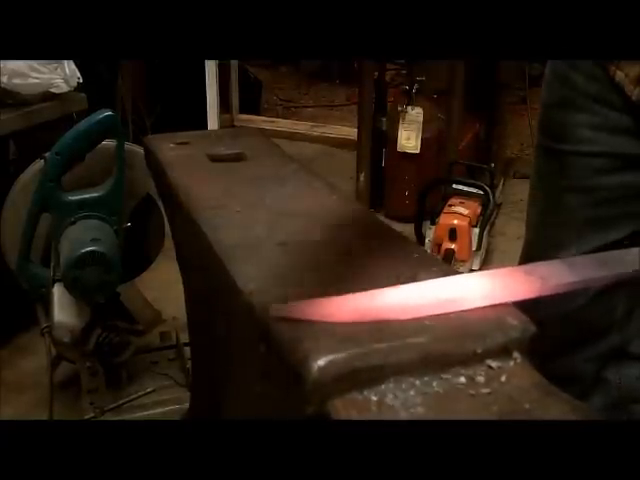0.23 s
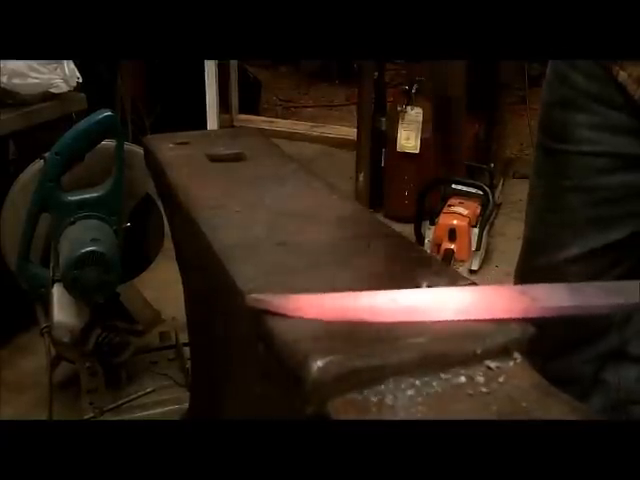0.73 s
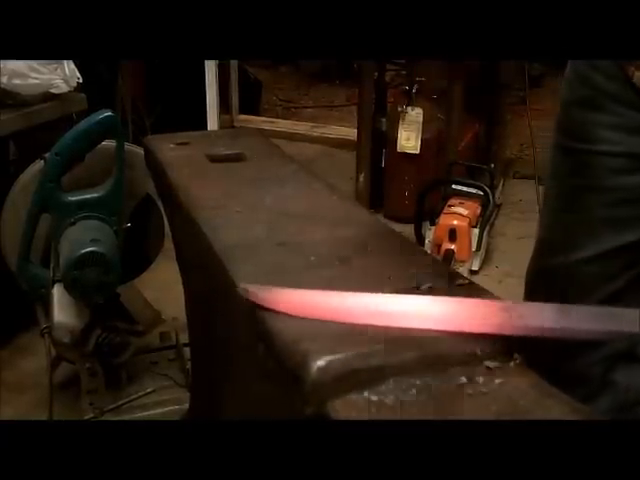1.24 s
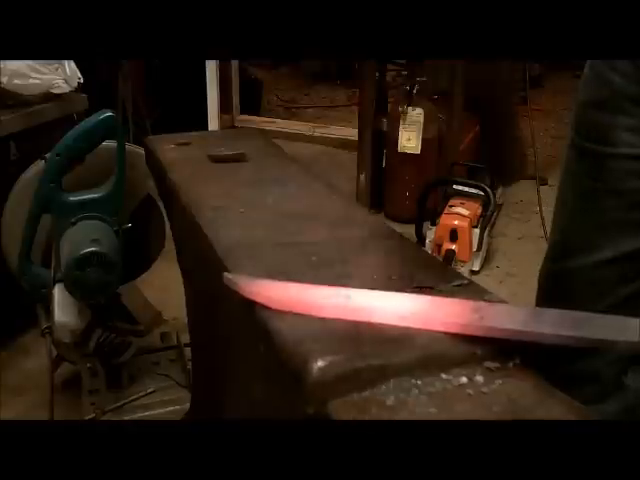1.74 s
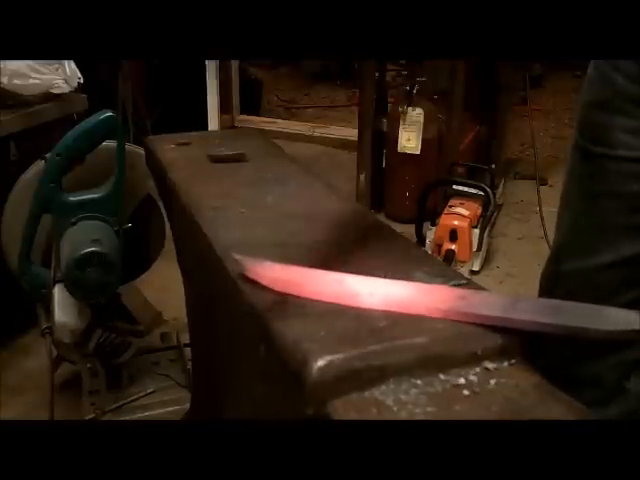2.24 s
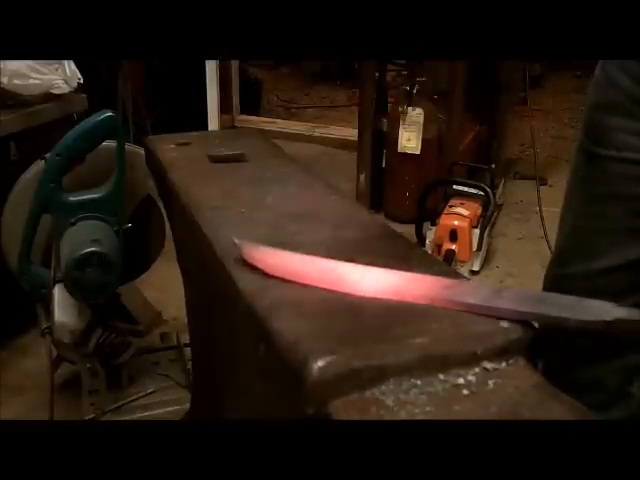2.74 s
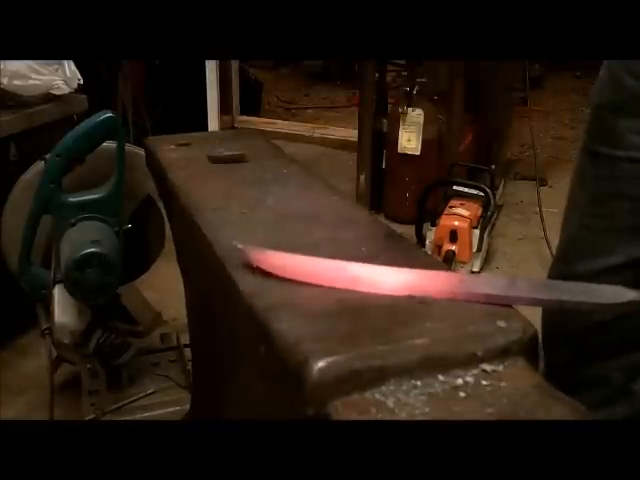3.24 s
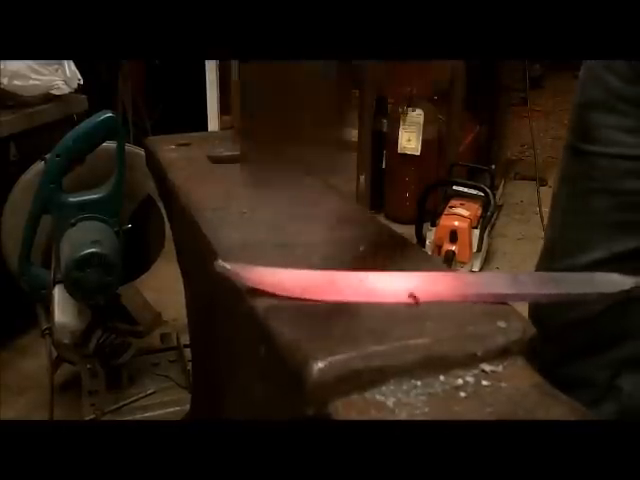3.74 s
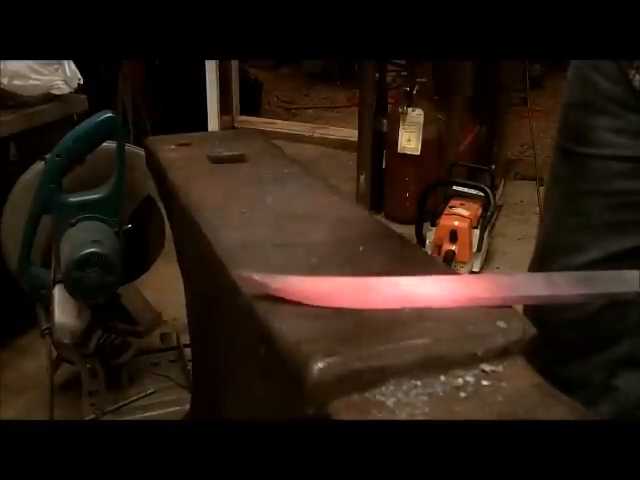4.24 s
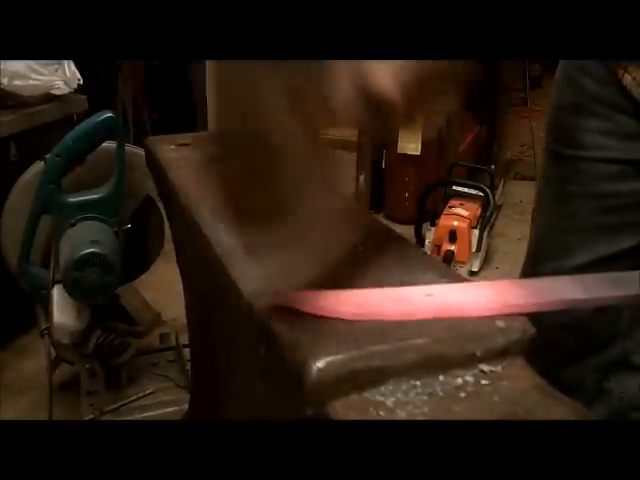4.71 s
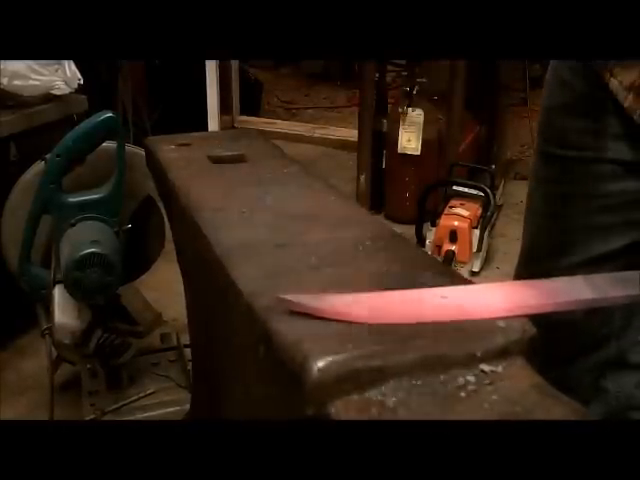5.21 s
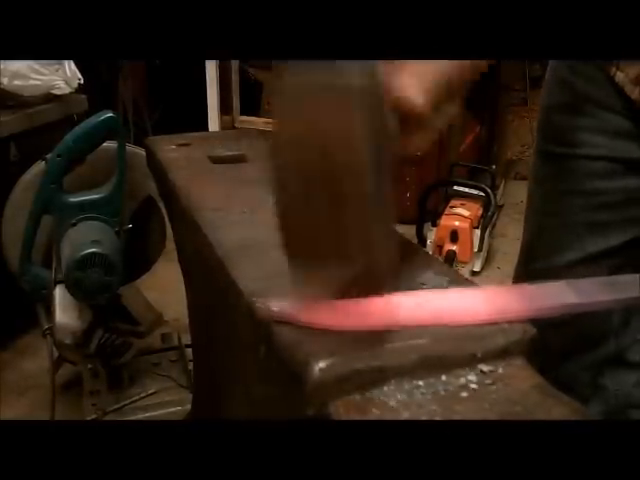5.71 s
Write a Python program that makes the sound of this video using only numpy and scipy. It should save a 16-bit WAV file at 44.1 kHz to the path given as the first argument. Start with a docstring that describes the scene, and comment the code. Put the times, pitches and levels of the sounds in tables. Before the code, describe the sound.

Steady quick hammer blows on an anvil, hard clanks with high ringing tails, a brief scrape of sliding steel, and workshop rush underneath.

```python
"""A smith hammers a red-hot blade on an anvil, three blows a second, in a small workshop.
Each blow sets decaying anvil modes ringing; where it lands decides which of them speak.
It also cracks (noise burst and shop echo), thuds (air pulses, rocking stand) and slaps the blade on the face.
Under it lie the shop's steady rush and the scrape of the sliding blade, both filtered noise.
A close camera's gain control ducks at loud blows and swells ring and rush back up in between."""
import sys
import numpy as np
from scipy import signal
from scipy.io import wavfile
from scipy.ndimage import uniform_filter1d

SR = 44100
rng = np.random.default_rng(int(sys.argv[2]) if len(sys.argv) > 2 else 0)


def store_pcm(level_fs):
    """Save levels as 16-bit WAV."""
    pcm = np.round(np.clip(level_fs, -1, 1) * 32767).astype(np.int16)
    wavfile.write(sys.argv[1], SR, np.atleast_2d(pcm).T)


N = 262836
TIME_S = np.arange(N) / SR

# hammer blows: (t/s, force/dB, press: ring lost while hammer and blade stay down/dB,
#                struck spot along the working stretch of the face/0-1, thud/dB, blade slap/dB)
HAMMER_BLOWS = [(-0.11, 19.5, 7, 0.71, -22, -21.5), (0.2273, 17, 5.5, 0.84, -10, 0),
                (0.5653, 16.5, 7.5, 0.8, -12, -7), (0.8933, 22.5, 7.5, 0.46, -9, 3),
                (1.2253, 19.3, 6.3, 0.45, -9.5, 0.3), (1.5589, 19, 8.5, 0.41, -2.5, 0.5),
                (1.8952, 21, 8, 0.25, -5.5, -1.5), (2.2459, 15.5, 2.5, 0.14, -41, -12),
                (2.6191, 17, 2.5, 0.19, -42, -22), (3.001, 21.5, 5.4, 0.22, -10, -21),
                (3.4232, 23, 5.5, 0.43, 5, -17), (3.785, 15.5, 0.15, 0.42, -10, -34),
                (4.1144, 10, -1.3, 0.82, -47, -44), (4.4456, 13.5, 1.5, 0.68, -12, -40),
                (4.7914, 18.5, 4.5, 0.64, -9.5, -1), (5.1325, 18.5, 6.5, .695, -0.3, -32),
                (5.4784, 21.5, 9, 0.42, -1, -13), (5.8114, 26, 9, 0.71, -5, 2)]
START_S, FORCE_DB, PRESS_DB, SPOT, THUD_DB, SLAP_DB = np.transpose(HAMMER_BLOWS)


def from_db(db):
    """Decibels to gain."""
    return 10 ** (np.asarray(db) / 20)


def at_hz(points, hz):
    """Read a table, linear over log frequency."""
    table_hz, values = np.transpose(points)
    return np.interp(np.log(hz), np.log(table_hz), values)


def fade(age_s, t60_s):
    """Exponential decay, 60 dB down at t60."""
    return np.exp(-np.log(1000) * age_s / t60_s)


def butter(x, hz, kind, order=2):
    """Causal Butterworth filter."""
    return signal.sosfilt(signal.butter(order, hz, kind, fs=SR, output="sos"), x)


def drift(knots_per_s):
    """Random wander about 0: unit-spread Gaussian knots joined by straight lines."""
    knots = rng.standard_normal(1024)
    return np.interp(TIME_S * knots_per_s, np.arange(len(knots)), knots)


def noise_bands():
    """Half-octave bands of unit white noise, neighbours unrelated: (centre Hz, band)."""
    edges_hz = 22 * 2 ** np.arange(0, 10, 0.5)
    white = rng.standard_normal((2, N))
    for k, (low, high) in enumerate(zip(edges_hz, edges_hz[1:])):
        yield np.sqrt(low * high), butter(white[k % 2], [low, high], "band")


def shaped_noise(spectrum):
    """Steady noise with the tabled spectrum."""
    return sum(from_db(at_hz(spectrum, hz)) * band for hz, band in noise_bands())


def latest_blow():
    """For each sample: row of the latest blow and the time since it landed."""
    row = np.maximum(np.searchsorted(START_S, TIME_S, side="right") - 1, 0)
    return row, np.maximum(TIME_S - START_S[row], 0)


def shop_rush():
    """Steady rush of the shop: broadband noise shaped in frequency."""
    # gain on unit white noise: (f/Hz, level/dB)
    rush_spectrum = [(30, -33), (150, -32.5), (500, -40), (1000, -34), (2000, -28), (3000, -36),
                     (4700, -31.5), (6500, -42.5), (9500, -51.5), (15000, -80)]
    return shaped_noise(rush_spectrum)


def blade_slide():
    """Hot steel and loose scale drag unevenly over the anvil between light blows: rumble and hiss."""
    # slide envelope: (t/s, level/dB)
    slide_level = [(3.8, -30), (3.87, 8), (4.0, -1), (4.18, 7), (4.32, 7), (4.44, -23), (4.5, -40)]
    # scrape, gain on unit white noise: (f/Hz, level/dB)
    scrape_spectrum = [(40, -35), (110, -26), (210, -31.5), (450, -40.5), (2000, -36), (6500, -61),
                       (9500, -48), (13000, -67)]
    level_db = np.interp(TIME_S, *np.transpose(slide_level), left=-100, right=-100)
    level_db = level_db + 0.96 * drift(30)
    return from_db(level_db) * shaped_noise(scrape_spectrum)


def blade_slap(row, age_s, blade_hz, t60_s, level_db):
    """A blade that does not lie flat claps onto the face; hot steel rings only a few cycles."""
    ring = np.sin(2 * np.pi * blade_hz * age_s) * fade(age_s, t60_s)
    return from_db(level_db + SLAP_DB[row]) * ring


def thud(row, age_s, firm_rise_s, gap_s, push_db, stand_hz, stand_t60_s, stand_db, rock_share,
         softening, firm_db):
    """Two shoves of air, hammer on blade then blade on anvil; the anvil rocks on its stand."""
    # a lighter blow shoves more slowly
    rise_s = firm_rise_s * from_db(softening * np.maximum(firm_db - FORCE_DB[row], 0))
    since = np.maximum([age_s, age_s - gap_s], 0) / rise_s
    push = from_db(push_db) * np.sum(since * np.exp(1 - since), axis=0)
    rock = np.sin(2 * np.pi * stand_hz * age_s) * fade(age_s, stand_t60_s)
    rock = from_db(stand_db + rock_share * THUD_DB[row]) * rock
    # a hammer that stays down rocks the stand more
    follow_through = np.sqrt(1 - from_db(-np.maximum(PRESS_DB[row], 0)))
    return from_db(THUD_DB[row]) * push + follow_through * rock


def crack_and_shop(row, age_s, bite_s, crack_t60_s, top_t60_s, bounce_db, shop_delay_s, splash_hz,
                   splash_growth, usual_press_db):
    """A few milliseconds of dense contact noise, then its echo building and dying in the shop."""
    # steel on steel, gain on unit white noise: (f/Hz, level/dB)
    crack_spectrum = [(100, -14.5), (350, -13), (900, -11), (1400, -2), (2000, -19.5), (3700, 0), (4800, 0),
                      (6500, -22), (9500, -11.5), (15000, -19.5)]
    # shop's answer, gain on unit white noise: (f/Hz, level/dB)
    shop_spectrum = [(30, -14.5), (90, -19.5), (170, -21.5), (400, -29.5), (1000, -31.5), (2000, -17.5),
                     (3000, -29), (4700, -28), (6500, -33.5), (9500, -37.5), (15000, -62)]
    # shop's decay: (f/Hz, t60/s)
    shop_decay = [(50, 0.4), (500, 0.41), (2000, 0.38), (5000, 0.53), (14000, 0.22)]
    press_db = PRESS_DB[row]
    # a hammer that bounces off at once cracks harder; a firm press leaves a brighter tail
    hardness = from_db(bounce_db * from_db(-press_db))
    splash = from_db(splash_growth * (press_db - usual_press_db))
    bite = hardness * (1 - np.exp(-age_s / bite_s))
    build = 1 - np.exp(-age_s / shop_delay_s)
    out = np.zeros(N)
    for hz, band in noise_bands():
        # the top of the crack is over first
        burst = bite * fade(age_s, crack_t60_s if hz < splash_hz else top_t60_s)
        crack = from_db(at_hz(crack_spectrum, hz)) * burst
        echo = from_db(at_hz(shop_spectrum, hz)) * build * fade(age_s, at_hz(shop_decay, hz))
        if hz > splash_hz:
            echo = echo * splash
        out += band * np.hypot(crack, echo)
    return out


def family_drive():
    """dB per family and blow: modes speak most far from their nodes; press alters each family's share."""
    # mode families 0-7, each one standing wave of the face:
    # (level/dB, growth/dB per dB of press, node place/stretch lengths, node spacing/stretch lengths)
    mode_families = [(1.52, -0.2, -0.61, 2.77), (8.5, 1.03, 0.59, 2.35), (-6, 1.12, -0.4, 2.25),
                     (0.66, 1.22, 0.26, 1.08), (-3.5, 1.2453, -0.35, 1.83), (-8, 2, -0.28, 1.59),
                     (-2, 1.3, 1.47, 3.3), (2.5, .5, -0.29, 4.5)]
    node_leak = 0.021   # share of a mode that a blow right on its node still drives
    drives_db = []
    for level_db, growth, node, spacing in mode_families:
        shape = np.sin(np.pi * (SPOT - node) / spacing)
        drives_db.append(level_db + growth * PRESS_DB + 20 * np.log10(np.hypot(shape, node_leak)))
    return drives_db + [np.zeros(len(START_S))]   # family 8 answers every spot alike


def anvil_ring(row, age_s, press_s, waver_db, waver_hz, level_db):
    """Each blow stops the old ring and starts decaying modes, damped while the hammer stays down."""
    # anvil modes: (f/Hz, level/dB, t60/s, family/0-8)
    anvil_modes = [(622, -46.3, 0.52, 2), (660, -43.8, 0.59, 2), (1282, -41.9, 2.17, 7),
                   (1337, -24.1, 2.8, 0), (1631, -27.8, 0.22, 8), (1701, -39.1, 1.49, 7),
                   (2749, -42.2, 2.95, 8), (3135.4, -29.1, 2.22, 1), (3162.6, -12.5, 0.49, 2),
                   (3407, -30.6, 1.82, 3), (3833, -37.7, 0.84, 6), (3908, -38.6, 0.58, 6),
                   (4249, -46.3, 0.82, 8), (4359, -40.3, 0.78, 8), (4712, -28.0, 0.28, 6),
                   (5138, -29.4, 1.69, 4), (5761.5, -31.1, 1.48, 5), (5798.5, -27.0, 1.35, 5),
                   (6202, -45.2, 1.12, 5), (6490, -42.5, 0.77, 5), (6642, -47.4, 0.57, 8),
                   (6969, -54.2, 0.6, 8), (8920, -54, 0.35, 8), (8959, -51.8, 0.39, 5),
                   (9621, -55.9, 0.53, 5), (10011, -57.4, 0.66, 8), (11560, -50.1, 0.53, 5),
                   (11597, -52.7, 0.52, 5), (12916, -55.2, 1.1, 8), (14717, -55, 0.4, 5)]
    drive_db = family_drive()
    out = np.zeros(N)
    for hz, mode_db, t60_s, family in anvil_modes:
        drive = from_db(mode_db + drive_db[int(family)])
        phase = rng.uniform(0, 2 * np.pi, len(START_S))
        # each tone wavers in level, the high ones most
        waver = from_db(waver_db * np.sqrt(hz / waver_hz) * drift(21.9))
        tone = np.sin(2 * np.pi * hz * age_s + phase[row])
        out += drive[row] * fade(age_s, t60_s) * waver * tone
    return out * from_db(level_db - PRESS_DB[row] * np.minimum(age_s / press_s, 1))


def scene():
    """Blows over rush and scrape, a touch to the right of the microphone pair."""
    row, age_s = latest_blow()
    slap = blade_slap(row, age_s, blade_hz=504, t60_s=0.018, level_db=-12.5)
    body = thud(row, age_s, firm_rise_s=0.00042, gap_s=0.00088, push_db=-12.5,
                stand_hz=35.6, stand_t60_s=0.23, stand_db=-23, rock_share=0.35,
                softening=0.8, firm_db=18.5)
    contact = crack_and_shop(row, age_s, bite_s=0.00046, crack_t60_s=0.015, top_t60_s=0.01,
                             bounce_db=8.0, shop_delay_s=0.001, splash_hz=8000,
                             splash_growth=1.0, usual_press_db=6.5)
    ring = anvil_ring(row, age_s, press_s=0.14, waver_db=1.8, waver_hz=2870, level_db=0.5)
    blows = from_db(FORCE_DB[row]) * (ring + contact + body + slap)
    right = blows + shop_rush() + blade_slide()
    left = np.concatenate([[0], right[:-1]])   # sound reaches the left port one sample later
    return np.array([left, right])


def gain_control(x, threshold_db, release_db_per_s, attack_s, opening_cut_db):
    """Gain drops within milliseconds of a loud treble peak and creeps back."""
    power = uniform_filter1d(butter(x[1], 1200, "high") ** 2, size=60)
    over_db = np.maximum(10 * np.log10(np.maximum(power, 1e-12)) - threshold_db, 0)
    over_db[0] = opening_cut_db   # still ducked by the blow just before
    # peak hold with a straight release in dB
    release_db = release_db_per_s * TIME_S
    held_db = np.maximum.accumulate(over_db + release_db) - release_db
    pole = np.exp(-1 / (attack_s * SR))
    cut_db, _ = signal.lfilter([1 - pole], [1, -pole], held_db, zi=[pole * held_db[0]])
    return x * from_db(-cut_db)


def record(dry):
    """Gain control, soft overload of peaks, the camera's response dips, low cut and top cut."""
    # narrow response dips: (f/Hz, width/Hz)
    response_dips = [(2700, 580), (5450, 930), (7800, 2730), (10900, 1580)]
    x = gain_control(dry, threshold_db=-6.0, release_db_per_s=32.0, attack_s=0.00092,
                     opening_cut_db=14.5)
    ceiling = 0.7
    x = x / (1 + (x / ceiling) ** 6) ** (1 / 6)
    for hz, width_hz in response_dips:
        x = signal.lfilter(*signal.iirnotch(hz, hz / width_hz, fs=SR), x)
    x = butter(x, 2.6, "high", order=1)
    top_cut = signal.ellip(8, 0.3, 80, 15600, fs=SR, output="sos")   # order, ripple/dB, stop/dB, f/Hz
    return signal.sosfilt(top_cut, x)


dry = scene()
out = record(dry)
store_pcm(out)
```